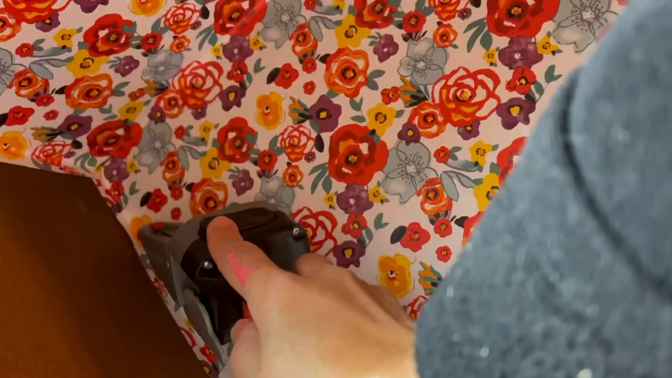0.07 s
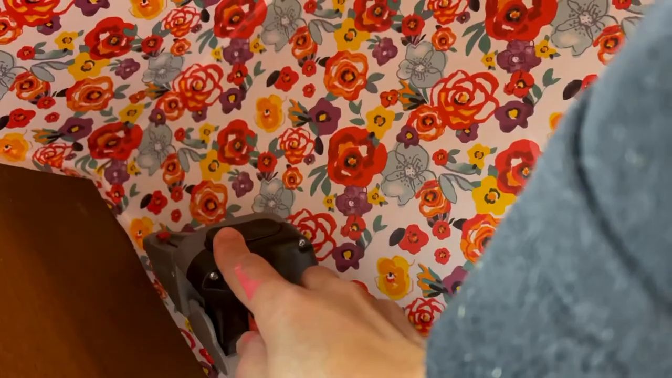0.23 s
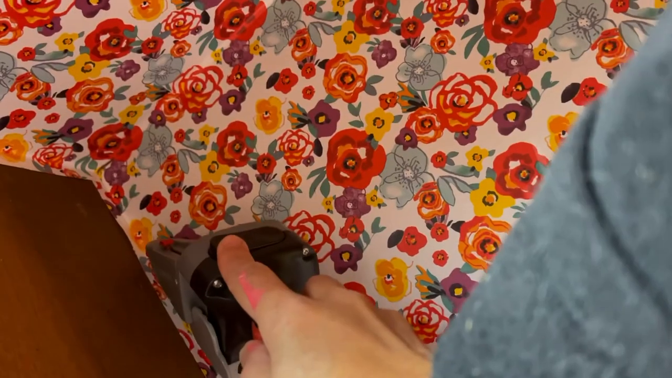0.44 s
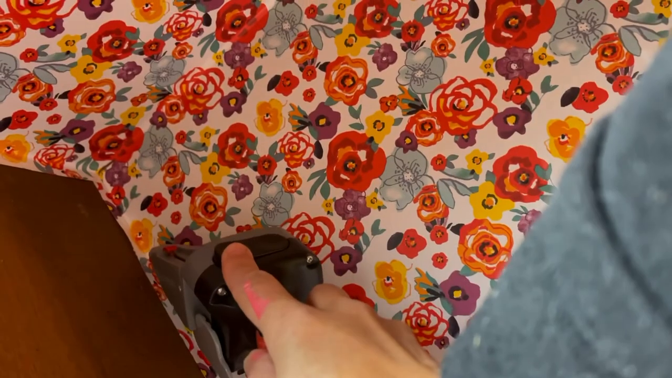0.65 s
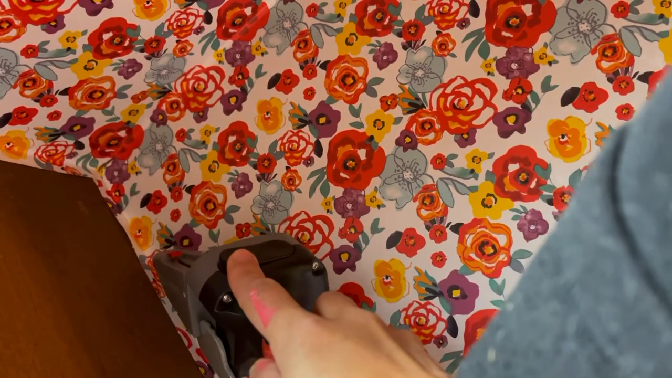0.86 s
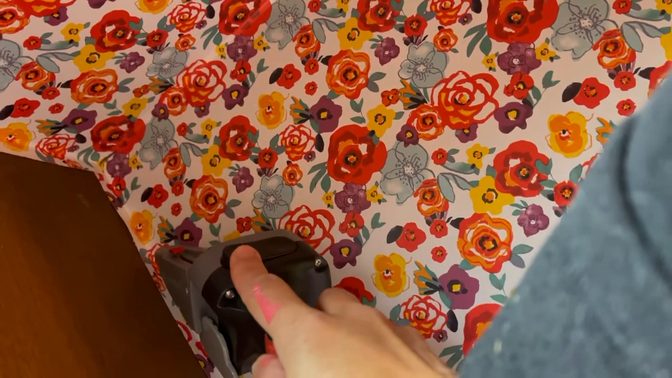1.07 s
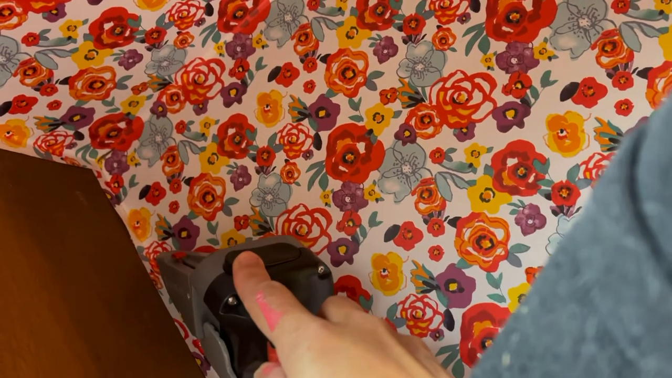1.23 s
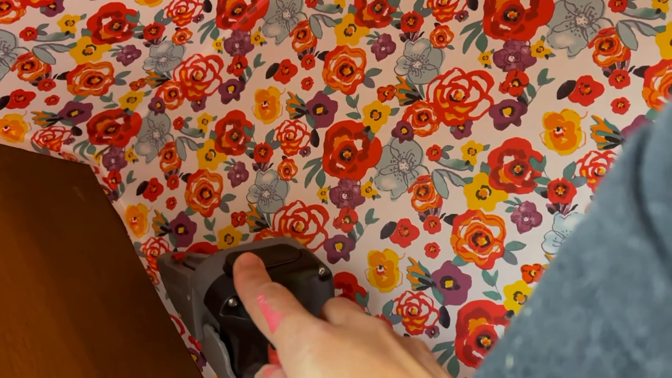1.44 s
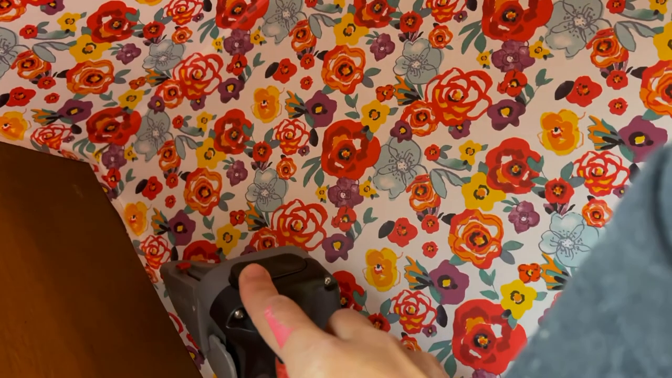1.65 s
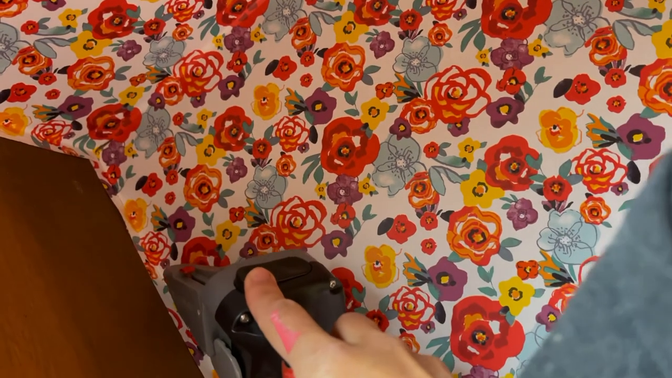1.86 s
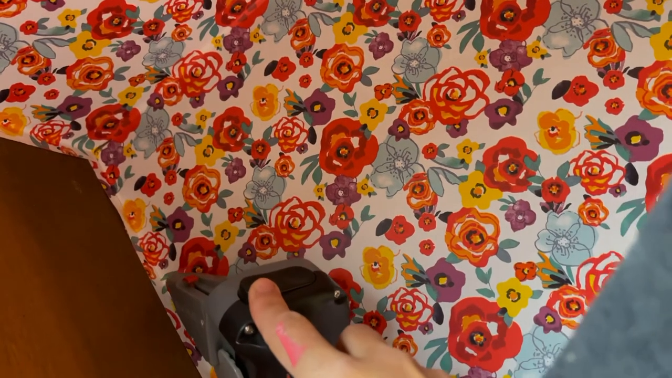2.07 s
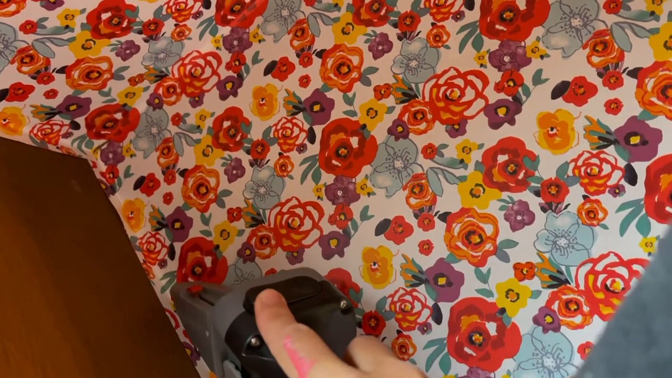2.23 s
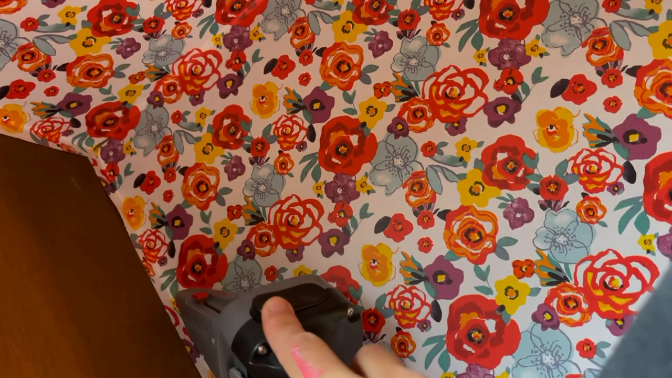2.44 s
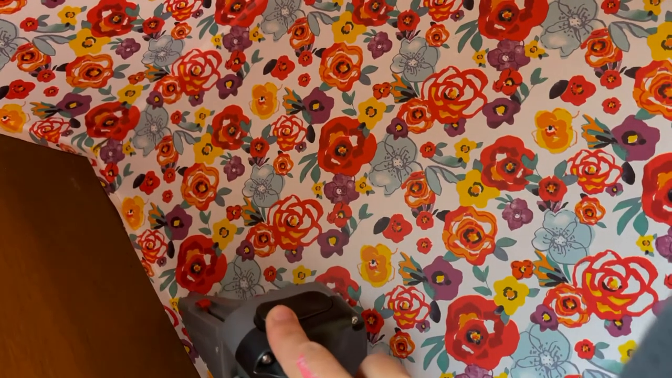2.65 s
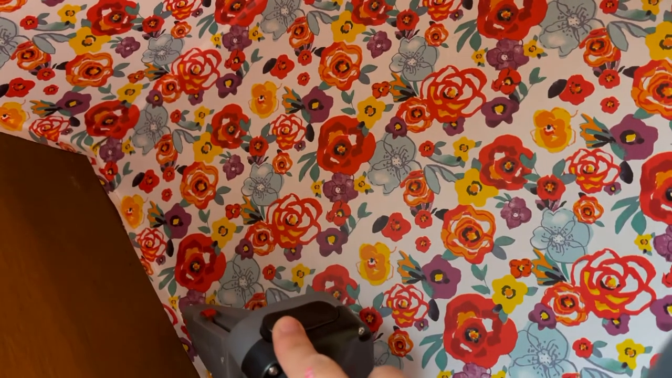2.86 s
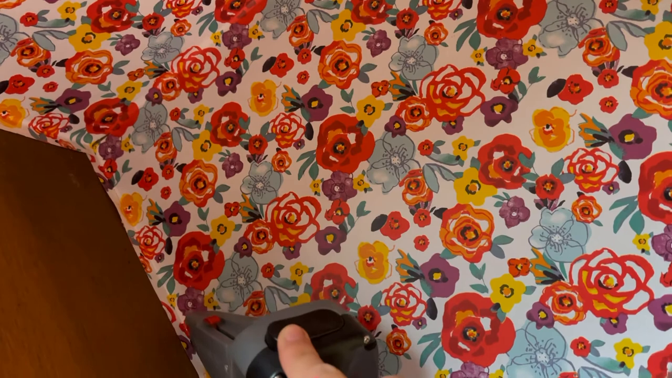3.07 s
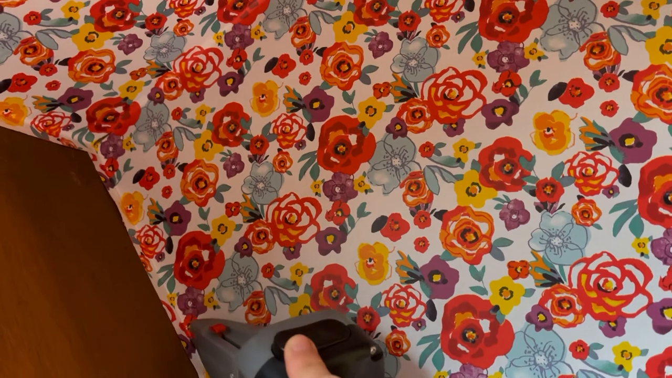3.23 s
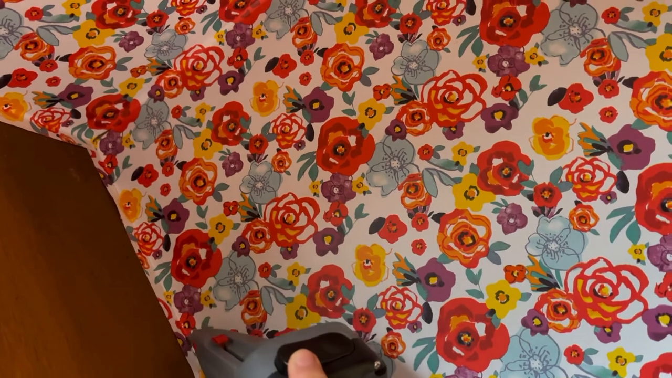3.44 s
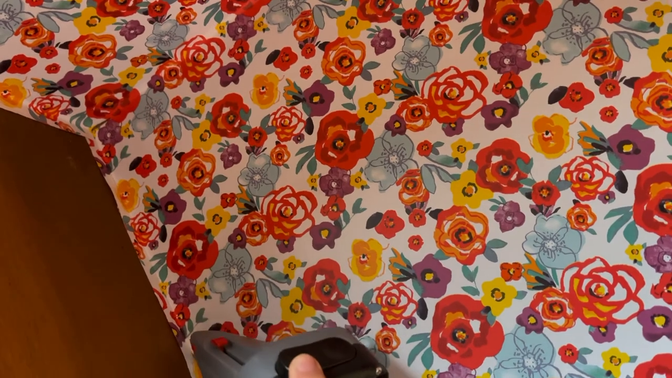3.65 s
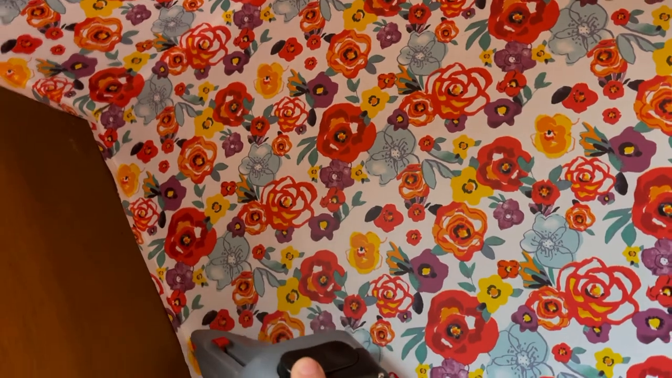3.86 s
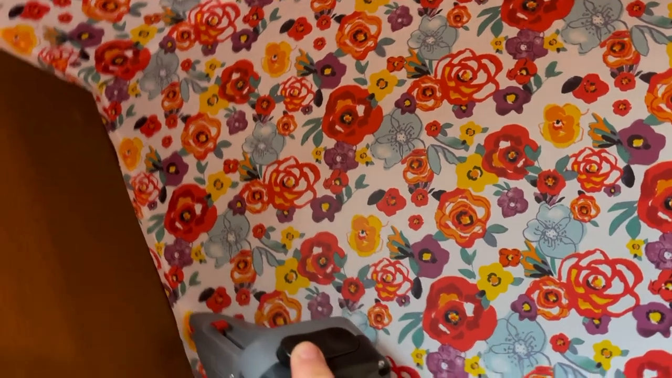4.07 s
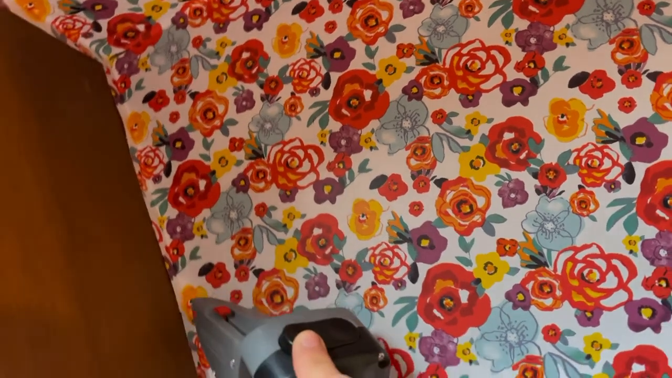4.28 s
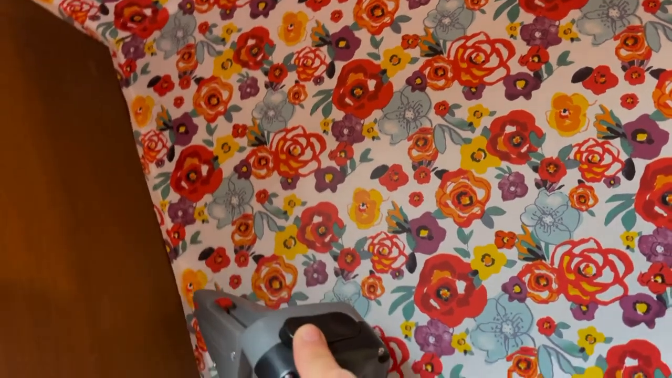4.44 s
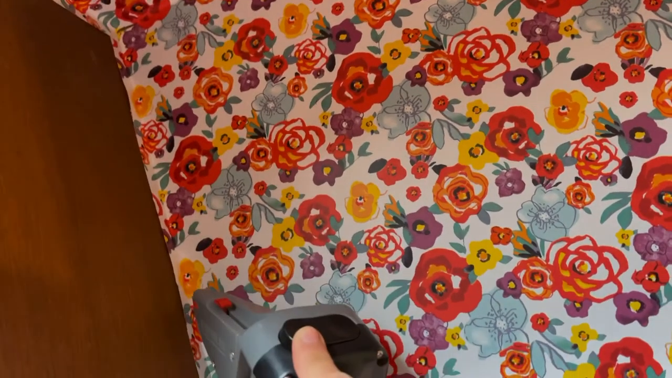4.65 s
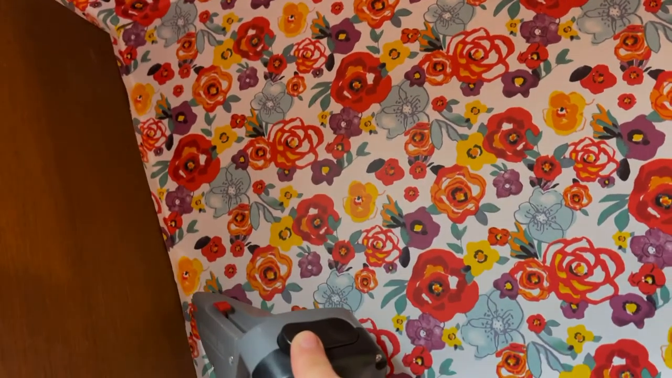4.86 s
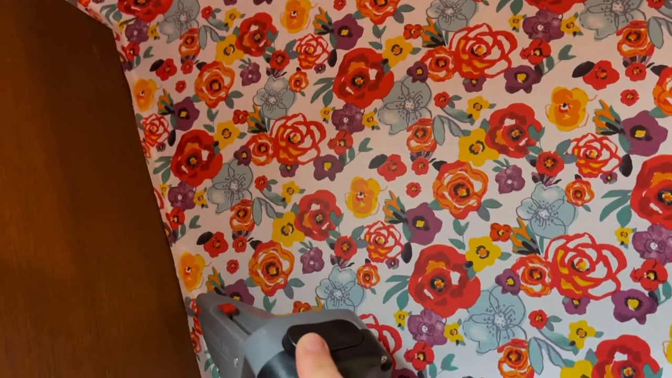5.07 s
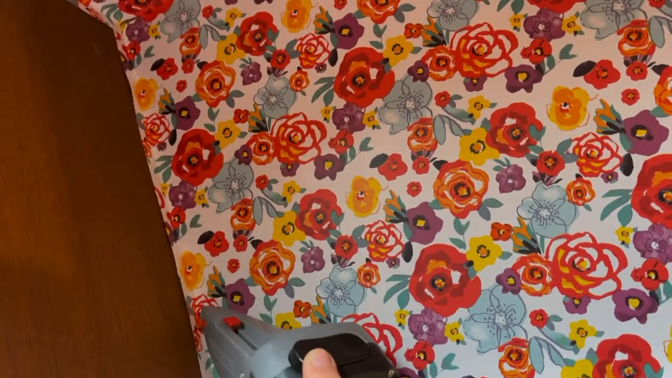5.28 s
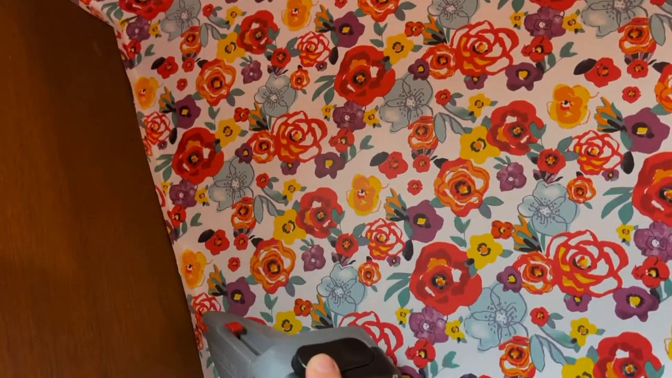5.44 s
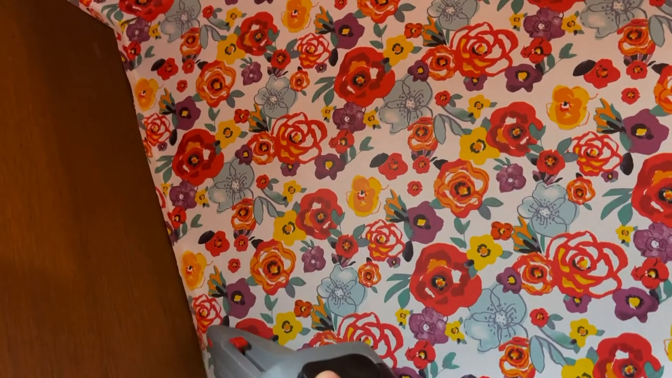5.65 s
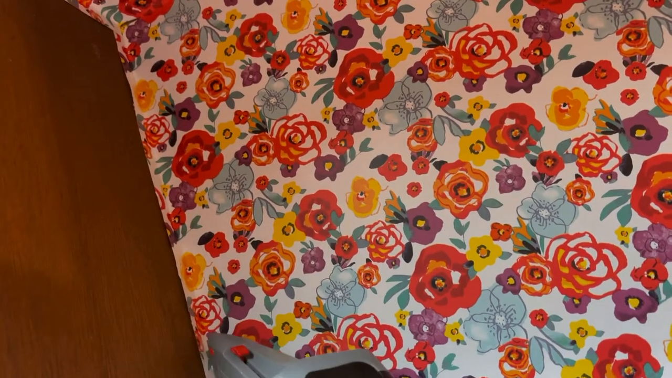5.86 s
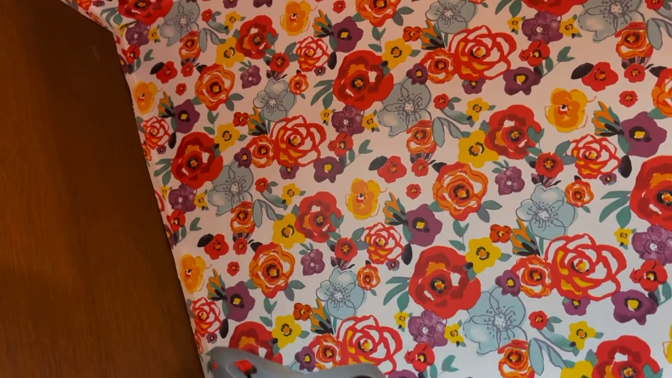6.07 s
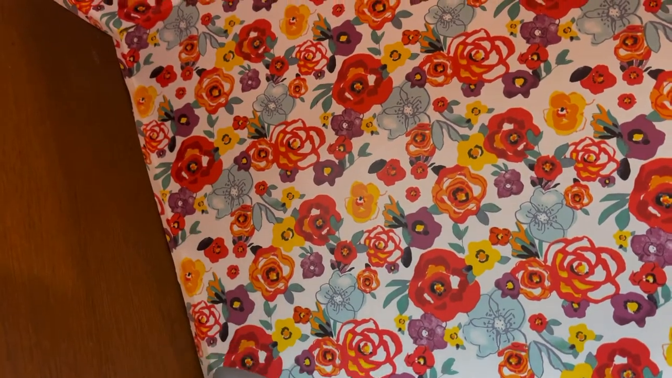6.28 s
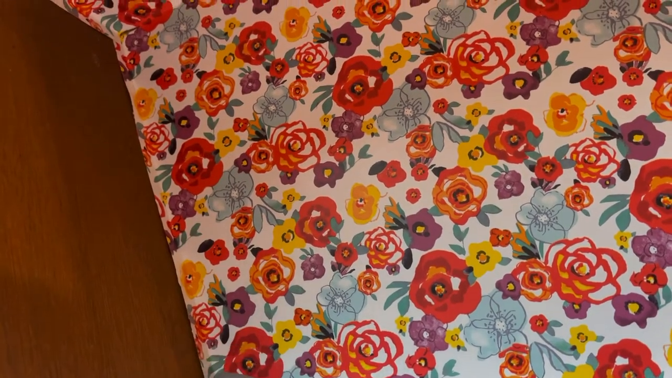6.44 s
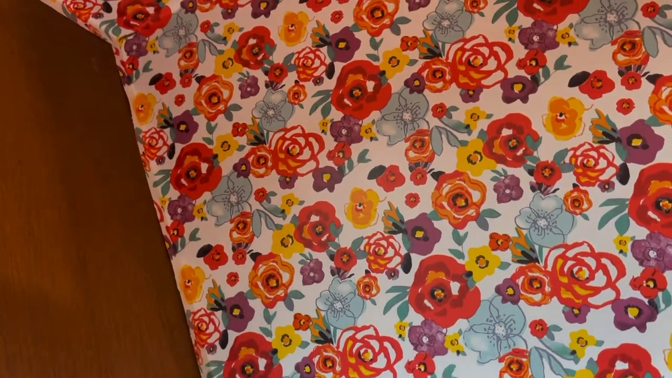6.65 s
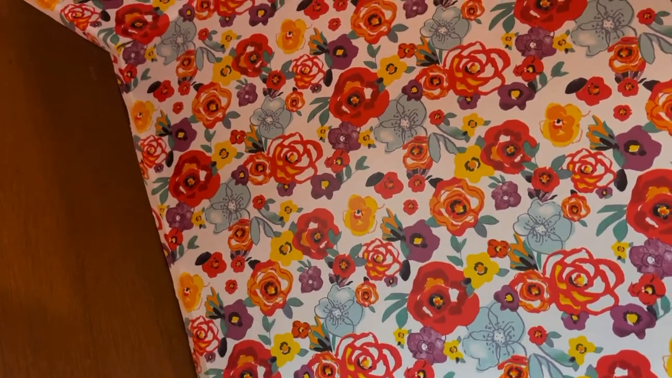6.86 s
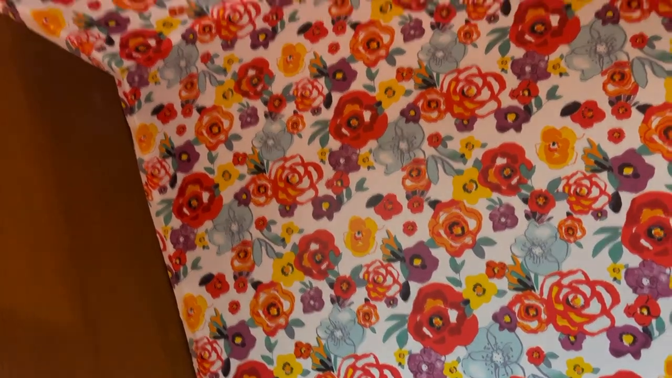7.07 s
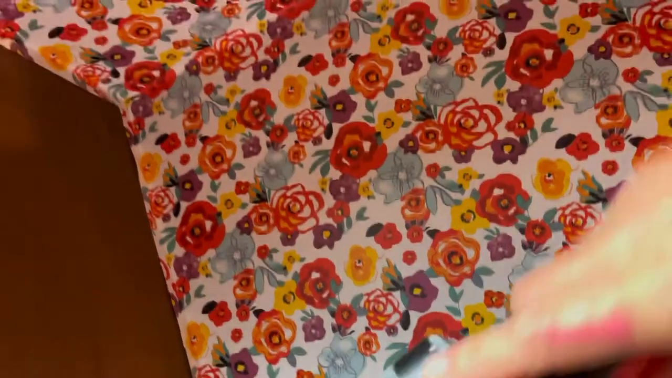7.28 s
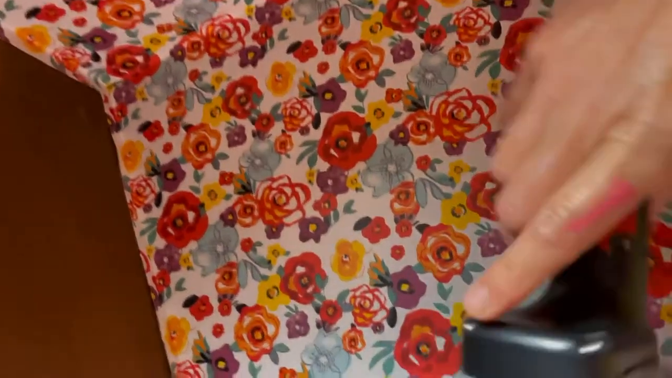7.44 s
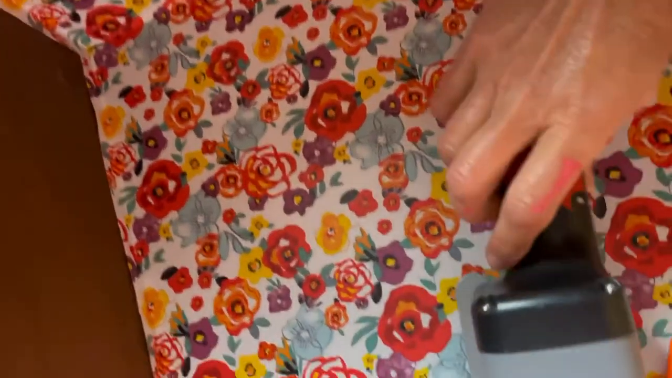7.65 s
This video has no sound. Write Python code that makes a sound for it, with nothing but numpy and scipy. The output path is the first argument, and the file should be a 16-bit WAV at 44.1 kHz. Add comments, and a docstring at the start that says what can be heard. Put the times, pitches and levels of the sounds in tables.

```python
"""A hard hand tool is pushed in short strokes along vinyl paper on the floor of a wooden cabinet, close by.
Rubbing is noise made of uneven slips, coloured by wood and vinyl; snags are short flurries, and the panel drums.
The edge skids off with a short rip made of jerks; faint squeaks are wavering tones.
A tool is put down: noise bursts for the clatter, struck low modes for the heavy thump.
Wall echoes, a slow sway and quiet noise surround it."""
import sys
import numpy as np
from scipy import signal
from scipy.fft import rfft, irfft, next_fast_len
from scipy.io import wavfile
from scipy.ndimage import uniform_filter1d

SR = 44100
rng = np.random.default_rng(int(sys.argv[2]) if len(sys.argv) > 2 else 0)


def store_wav(level_fs):
    """Save 16-bit WAV to argv[1]."""
    pcm = np.round(np.clip(np.atleast_2d(level_fs), -1, 1) * 32767)
    wavfile.write(sys.argv[1], SR, pcm.T.astype(np.int16))


N = 340011
SIZE = next_fast_len(N + SR)   # filter length, with room for tails
HZ = np.maximum(np.arange(SIZE // 2 + 1) * SR / SIZE, 1)
T = np.arange(N) / SR


def from_db(db):
    """Decibels to gain."""
    return 10 ** (np.asarray(db) / 20)


def rms_one(x):
    """Scaled to unit power."""
    return x / np.sqrt(np.mean(np.abs(x) ** 2) + 1e-20)


def over_hz(points):
    """A table joined by straight lines on a log-frequency axis."""
    hz, value = np.transpose(points)
    return np.interp(np.log(HZ), np.log(hz), value)


def causal(db):
    """The minimum-phase filter with these levels: nothing sounds early."""
    cepstrum = irfft(db * np.log(10) / 20, SIZE)
    cepstrum[1:SIZE // 2] *= 2
    cepstrum[SIZE // 2 + 1:] = 0
    return np.exp(rfft(cepstrum))


def through(x, response):
    """Filter a signal by a frequency response."""
    return irfft(rfft(x, SIZE) * response, SIZE)[..., :N]


def drift(rate_hz):
    """A random curve with spread 1: noise smoothed so that it wanders at about this rate."""
    r = np.exp(-2 * np.pi * rate_hz / SR)
    wander = signal.lfilter([1], [1, -2 * r, r * r], rng.standard_normal(N + SR))
    return rms_one(wander[SR:])


def ring(force, hz, t60_s):
    """A resonance: each unit click sets a dying sine of height 1 ringing."""
    r = from_db(-60 / (t60_s * SR))
    w = 2 * np.pi * hz / SR
    return signal.lfilter([0, np.sin(w)], [1, -2 * r * np.cos(w), r * r], force + 1e-18)


def fading(start_s, t60_s):
    """An envelope that jumps to 1 and dies away by 60 dB in t60_s."""
    out, first = np.zeros(N), int(start_s * SR)
    age = T[:min(int(2 * t60_s * SR) + 1, N - first)]
    out[first:first + len(age)] = from_db(-60 * age / t60_s)
    return out


def evened(x, seconds):
    """Unit level over stretches of this length; faster flutter stays."""
    power = uniform_filter1d(x * x, max(int(seconds * SR), 2))
    return x / np.sqrt(np.abs(power) + 1e-12)


def stroke(start_s, length_s, attack_s, release_s, arch_db):
    """One movement of the hand: it gets going, is strongest midway by arch_db, and comes to rest."""
    out = np.zeros(N)
    during = (T > start_s) & (T < start_s + length_s + release_s)
    age = T[during] - start_s
    rise = np.clip(age / attack_s, 0, 1)
    fall = np.clip((length_s - age) / release_s + .5, 0, 1)
    off_centre = np.minimum(2 * age / length_s - 1, 1)
    out[during] = rise * fall * from_db(-arch_db * off_centre ** 2)
    return out


# the edge catches and lets go: start_s, level_db (before the shares in scraping),
# brightness_db (moves the snag from wood to vinyl)
SNAG_EVENTS = [(0.043, -26.5, -5), (0.223, -33, -6.5), (0.277, -34, -1), (0.4634, -19, -3.5),
               (0.4816, -30, -3), (0.7828, -23.5, -3), (0.803, -27, -2), (1.12, -27, -3), (1.3696, -29, 0),
               (1.428, -26.5, -5), (1.469, -27, -1), (1.627, -41, -3), (1.668, -39.5, -1.5),
               (1.8973, -25.5, -7.5), (2.0348, -26, 2), (2.0754, -21.5, -2), (2.14, -25, -3),
               (2.205, -22.5, -5), (2.277, -26, -2.5), (2.3468, -29, 0), (2.366, -27, -3.5),
               (2.477, -25, -4), (2.5958, -22.5, -4.5), (2.658, -21, -2), (2.692, -26.5, 1.5),
               (2.724, -34.5, 7), (2.867, -28, -4.5), (2.92, -32.5, -13.5), (2.955, -27.5, -5.5),
               (3.016, -26.5, -6.5), (3.1623, -25, -2.5), (3.217, -24, -6), (3.2947, -22, -2.5),
               (3.3205, -20, -3), (3.446, -30, -5), (3.542, -24.5, -6.5), (3.568, -38.5, -8.5),
               (3.628, -22.5, -3), (3.74, -36, -3), (3.896, -31, -4), (4.026, -31, -8.5),
               (4.062, -31.5, -5), (4.137, -26, -8.5), (4.179, -26, -6), (4.199, -27, -9),
               (4.254, -19.5, -6), (4.384, -24.5, -3.5), (4.4154, -28, -12.5), (4.509, -19.5, -3.5),
               (4.565, -27.5, -9.5), (4.747, -30.5, -5), (4.832, -31, -7), (4.925, -28, -5),
               (5.08, -24.5, -4), (5.098, -21.5, -5), (5.171, -26, -5.5), (5.4844, -23, -8.5),
               (5.533, -20, -6.5), (5.594, -23, -8), (5.665, -25, -6.5), (5.69, -28, -9.5),
               (5.741, -34.5, -0.5), (5.8193, -29.5, -4), (5.887, -19.5, -1.5), (5.9162, -19.5, -6.5),
               (5.9682, -20, -6), (6.019, -25.5, -8), (6.078, -18.5, -6.5), (6.172, -19.5, -6.5),
               (6.253, -34.5, -18), (6.555, -32, -12), (6.625, -15, -6), (6.831, -36.5, -11)]
# colour of the hissing vinyl: freq_hz, level_db (relative)
VINYL_COLOUR = [(2500, -34.5), (4200, -6), (5200, -7.5), (7000, 1.5), (9000, -4.5), (12000, 1.5),
                (16000, -23.5)]
# a soft swish over the vinyl just before the skid
SWISH_S, SWISH_LENGTH_S, SWISH_DB, SWISH_RAMP_S = 6.87, 0.19, -60.5, 0.0089
# on one light, gliding push the vinyl hisses in a narrow band
ZING_S, ZING_LENGTH_S, ZING_DB, ZING_ARCH_DB, ZING_HZ, ZING_T60_S = 1.35, 0.26, -49.5, 8, 5620, 0.03
RASP_STEADY = 0.15   # share of the rasp's power that comes from the smoothly sliding sole


def scraping(rasp, hiss, back_db, rasp_db=2.0, hiss_db=1.0, snag_rasp_db=-14.0, snag_hiss_db=-9.5, snag_t60_s=0.046):
    """One friction force sounds the wood below and the vinyl skin above; a snag is a short flurry of slips."""
    grain = friction(slips_per_s=1900, spread_db=2.6, clump_db=2.1, clump_rate_hz=90, smooth=0.5,
                     catches_per_s=95, catch_db=2.5, catch_t60_s=0.015)
    grain = rms_one(grain + grit())
    flurry, catch, snap = rng.standard_normal(N), 0, 0
    for s, db, bright_db in SNAG_EVENTS:
        release = from_db(db) * fading(s, snag_t60_s)
        catch = catch + from_db(snag_rasp_db - bright_db) * release
        snap = snap + from_db(snag_hiss_db + bright_db) * release
    sliding = np.sqrt(1 - RASP_STEADY) * grain + np.sqrt(RASP_STEADY) * rng.standard_normal(N)
    wood_force = from_db(rasp_db) * rasp * sliding + catch * flurry

    swish = from_db(SWISH_DB) * stroke(SWISH_S, SWISH_LENGTH_S, SWISH_RAMP_S, SWISH_RAMP_S, 0)
    vinyl_force = from_db(hiss_db) * hiss * grain + (snap + swish) * flurry
    skin = through(vinyl_force, rms_one(causal(over_hz(VINYL_COLOUR) + back_db)))

    glide = from_db(ZING_DB) * stroke(ZING_S, ZING_LENGTH_S, PUSH_ATTACK_S, PUSH_RELEASE_S, ZING_ARCH_DB)
    zing = glide * rms_one(ring(sliding, ZING_HZ, ZING_T60_S))
    return wood(wood_force) + skin + zing


# pushes of the hand: start_s, length_s, rasp_db, hiss_db (vinyl), drum_db (panel); later steps trim all three
HAND_PUSHES = [(-0.01, 0.21, -44.5, -49.5, -39.5), (0.172, 0.29, -50.5, -54, -46),
               (0.69, 0.17, -48.5, -54.5, -43.5), (1.034, 0.16, -46, -51, -53),
               (1.278, 0.19, -56, -53.5, -61), (1.377, 0.25, -45.5, -50, -38.5),
               (1.76, 0.14, -45.5, -50.5, -43), (1.948, 0.28, -47, -50.5, -43),
               (2.334, 0.091, -47, -49, -38.5), (2.54, 0.35, -45, -51.5, -44),
               (2.87, 0.18, -45.5, -49.5, -44), (2.944, 0.25, -46.5, -64, -53),
               (3.146, 0.25, -43, -48, -39), (3.406, 0.093, -45.5, -48.5, -31.5),
               (3.461, 0.33, -43, -48.5, -43), (3.939, 0.26, -43.5, -49, -37.5),
               (4.123, 0.13, -46, -50, -36), (4.346, 0.15, -41, -50, -46), (4.465, 0.18, -54, -72, -36),
               (4.787, 0.084, -47.5, -55, -43), (5.016, 0.31, -41, -48.5, -33.5),
               (5.365, 0.32, -39.5, -47.5, -32), (5.864, 0.063, -36, -45.5, -40),
               (5.936, 0.15, -37, -47, -29), (6.04, 0.25, -36.5, -44, -26.5),
               (6.547, 0.18, -32, -41, -24.5), (6.825, 0.041, -43, -53, -43)]
PUSH_ATTACK_S, PUSH_RELEASE_S, PUSH_ARCH_DB = 0.017, 0.028, 8
# between pushes the tool creeps on: start_s, length_s, rasp_db (trimmed in scraping)
SLOW_CREEPS = [(-0.03, 0.94, -54.5), (0.971, 0.73, -54), (1.701, 3.03, -49), (4.545, 0.16, -61.5),
               (4.715, 1.06, -50), (5.808, 0.51, -49), (6.511, 0.272, -46.5)]
CREEP_RAMP_S, CREEP_ARCH_DB = 0.033, 1
CREEP_HISS_DB, CREEP_DRUM_DB = -6, 9.5   # relative to its rasp, before the later trims


def effort():
    """Pushes and creeping set the strength of the rasp, the hiss and the drumming; their powers add."""
    shapes, levels_db = [], []
    for s, length, db in SLOW_CREEPS:
        shapes.append(stroke(s, length, CREEP_RAMP_S, CREEP_RAMP_S, CREEP_ARCH_DB))
        levels_db.append([db, db + CREEP_HISS_DB, db + CREEP_DRUM_DB])
    for s, length, *push_db in HAND_PUSHES:
        shapes.append(stroke(s, length, PUSH_ATTACK_S, PUSH_RELEASE_S, PUSH_ARCH_DB))
        levels_db.append(push_db)
    return np.sqrt(from_db(levels_db).T ** 2 @ np.array(shapes) ** 2)


# the edge hangs and the rubbing weakens: start_s, length_s, change_db
EDGE_HALTS = [(0.234, 0.028, -4.5), (0.565, 0.05, -5.5), (1.239, 0.02, -5), (1.859, 0.03, -4.5),
              (1.9, 0.044, -2), (2.5, 0.031, -2.5), (2.73, 0.013, -6), (2.908, 0.021, -12),
              (3.277, 0.012, -4), (3.91, 0.035, -3), (4.153, 0.012, -8), (4.211, 0.033, -8),
              (4.398, 0.014, -4.5), (4.444, 0.014, -1), (4.53, 0.021, -1), (4.616, 0.058, -11),
              (5.465, 0.013, -5), (5.705, 0.034, -3), (5.848, 0.044, -3.5)]
HALT_RAMP_S = 0.0053


def sticking():
    """The share of the rubbing that is left while the edge hangs."""
    return from_db(sum(db * stroke(s, length, HALT_RAMP_S, HALT_RAMP_S, 0) for s, length, db in EDGE_HALTS))


def friction(slips_per_s, spread_db, clump_db, clump_rate_hz, smooth, catches_per_s, catch_db, catch_t60_s):
    """Tiny slips of uneven size come in clumps, on a bed of smooth sliding; small catches let go with a jerk."""
    sizes = from_db(spread_db * np.minimum(rng.exponential(1, N), 4)) * rng.choice([-1, 1], N)
    slips = rms_one(sizes * (rng.random(N) < slips_per_s / SR))
    catches = (rng.random(N) < catches_per_s / SR) * rng.random(N)
    decay = from_db(-60 / (catch_t60_s * SR))
    jerks = signal.lfilter([1], [1, -decay], catches + 1e-18)
    grip = from_db(clump_db * drift(clump_rate_hz)) * (1 + from_db(catch_db) * jerks)
    return evened((slips + smooth * rng.standard_normal(N)) * grip, 0.087)


TICKS_PER_S, TICK_DB, TICK_T60_S = 45, 3.5, 0.004   # level relative to the rubbing, before random sizes


def grit():
    """Specks crushed under the sole: dry, very short ticks."""
    ticks = (rng.random(N) < TICKS_PER_S / SR) * rng.uniform(.5, 2, N)
    decay = from_db(-60 / (TICK_T60_S * SR))
    bursts = signal.lfilter([1], [1, -decay], ticks + 1e-18)
    return from_db(TICK_DB) * bursts * rng.standard_normal(N)


# colour of the rubbed wood: freq_hz, level_db (relative)
WOOD_COLOUR = [(120, -41), (220, 4.5), (300, -4), (480, -0.5), (800, -3), (1200, -5.5), (1700, -8.5),
               (2400, -9.5), (3600, -10), (4600, -24), (5600, -21), (9000, -70)]
# the stiff corner, where the tool works at first, recolours the rasp: freq_hz, change_db
CORNER_COLOUR = [(280, 0.5), (370, -4.5), (500, 0), (780, 4.5), (1050, 2.5), (1380, -3.5), (1800, 0.5)]
CORNER_UNTIL_S = 1.36
ROCKING_HZ, RESONANCE_BEND = 3.5, 0.04   # pace of the rocking; largest bend as a share of the pitch


def wood(force):
    """The panel's answer to a rubbing force; its resonances bend down and up as the tool rocks."""
    out, forward, tilt = 0, frontness(), np.tanh(drift(ROCKING_HZ))
    corner = .5 - .5 * np.tanh((T - CORNER_UNTIL_S) / CROSSING_S)
    force = (1 - corner) * force + through(corner * force, causal(over_hz(CORNER_COLOUR)))
    # blend three fixed filters: bent down, straight, bent up
    for lean in (-1, 0, 1):
        back_db, front_db, _ = wood_db(lean * RESONANCE_BEND)
        part = force * np.maximum(1 - np.abs(tilt - lean), 0)
        for share, bumps_db in ((1 - forward, back_db), (forward, front_db)):
            out = out + through(share * part, rms_one(causal(over_hz(WOOD_COLOUR) + bumps_db)))
    return out


# higher resonances of panel and tool: pitch_hz, width_hz, back_db, front_db, edge_db
# (height above the rest; the tool's edge is weakened where it is used)
HIGH_RESONANCES = [(233, 78, -2.5, 3, -5.5), (295, 47, 5.5, 8, -6), (390, 35.6, 8, 10.5, 8.5),
                   (580, 60, 11, 9.5, 9), (663, 43, -14, 12, -6), (915, 50, 5.5, 11.5, 4),
                   (1084, 310, 0.5, 5, -0.5), (1400, 72, 9, 11, 11), (1613, 91, 3, 8, 5),
                   (1817, 17, 7, -10, -2), (1925, 145, -1, 8.5, -6), (2218, 190, 8, 8.5, 1),
                   (2550, 160, 7.5, 12, 3), (3007, 240, -2, 9, -6), (3760, 89, -15, -1, -6),
                   (4224, 460, 5.5, 11, 1.5), (5500, 760, 4.5, -4.5, 1), (6680, 810, -3, 20, -10.5)]


def wood_db(bend):
    """Resonance bumps in dB, pitches bent by this share: at the back, at the front, on the tool's edge."""
    bumps_db = 0
    for hz, width, *heights_db in HIGH_RESONANCES:
        peak = 1 / (1 + (2 * (HZ - hz * (1 + bend)) / width) ** 2)
        bumps_db = bumps_db + np.outer(heights_db, peak)
    return bumps_db


MIDWAY_S, CROSSING_S = 4.74, 0.38   # when and how fast the tool crosses the middle of the panel


def frontness():
    """The tool travels from the back of the panel (0) to the front (1), and other resonances take over."""
    return .5 + .5 * np.tanh((T - MIDWAY_S) / CROSSING_S)


# low modes of the panel: pitch_hz, t60_s, back_db (rubbed there), front_db (rubbed there), struck_db
PANEL_MODES = [(56.9, 0.17, -16, -17, -12), (70.8, 0.17, -8, -11, 0), (87, 0.27, -4, -9, -13),
               (121.8, 0.26, -4, 1.5, -8), (141.4, 0.16, 1, 2, -10.5), (159.9, 0.18, 3, 0, 1.5),
               (200.5, 0.11, -5.5, -3.5, -4), (385, 0.043, -13.5, -15.5, 1), (561, 0.13, -30, -54, 0.5)]


def panel(drum, skid_db=-26.0, skid_s=7.03, skid_t60_s=0.34):
    """The dragged tool shakes the panel's low modes, which also shudder after the skid."""
    force, forward, modes = thuds(), frontness(), 0
    for k, (hz, t60, back_db, front_db, _) in enumerate(PANEL_MODES):
        level = from_db(back_db + (front_db - back_db) * forward)
        modes = modes + level * ring(force, hz, t60)[SR:] * (-1) ** k
    shudder = from_db(skid_db) * uniform_filter1d(fading(skid_s, skid_t60_s), size=1500)
    return (drum + shudder) * evened(modes, 0.058)


# the sole rocks and bumps the panel: start_s, level_db
SOLE_BUMPS = [(0.15, -38.5), (0.81, -39.5), (1.11, -33), (1.805, -35), (1.9, -35.5), (2.648, -30),
              (3.075, -34.5), (3.2, -31.5), (3.315, -35), (3.54, -28.5), (3.625, -30), (3.735, -31.5),
              (4.392, -27), (4.482, -28), (4.70, -42), (4.805, -31), (5.465, -34), (5.645, -31.5),
              (5.91, -22.5), (5.965, -25.5), (6.575, -23.5), (6.671, -20.5)]
BUMP_LENGTH_S, BUMP_ARCH_DB, PUSH_DRUM_DB = 0.049, 14, -1
DRUM_T60_S, DRUM_LAG_S = 0.35, 0.017   # the panel answers late and rings on after each push


def drumming(drive):
    """How strongly the panel shakes: it follows the pushes a little late and jumps at every bump."""
    pushed = np.interp(T - DRUM_LAG_S, T, from_db(PUSH_DRUM_DB) * drive)
    ramp_s = BUMP_LENGTH_S / 10
    bumped = sum(from_db(db) * stroke(s, BUMP_LENGTH_S, ramp_s, ramp_s, BUMP_ARCH_DB) for s, db in SOLE_BUMPS)
    return ringing_on(np.hypot(pushed, bumped), DRUM_T60_S)


def ringing_on(level, t60_s):
    """A level that cannot fall faster than this decay."""
    decay = np.log(1000) * T / t60_s
    return np.exp(np.maximum.accumulate(np.log(level + 1e-9) + decay) - decay)


THUDS_PER_S, THUD_SPREAD_DB, THUD_SMOOTH = 70, 2.0, 0.028


def thuds():
    """The sole judders over the panel in uneven little thuds, on a weak bed of steady dragging."""
    count = N + SR   # one extra second lets the modes build up
    sizes = from_db(THUD_SPREAD_DB * rng.standard_normal(count)) * rng.choice([-1, 1], count)
    return sizes * (rng.random(count) < THUDS_PER_S / SR) + THUD_SMOOTH * rng.standard_normal(count)


# the skidding edge bites and lets go: start_s, level_db
EDGE_JERKS = [(7.003, -17), (7.0058, -14), (7.013, -15.5), (7.0185, -17.5), (7.027, -17.5), (7.04, -16),
              (7.0458, -15)]
JERK_T60_S = 0.024
# colour of the skid: freq_hz, level_db (relative)
SKID_TONE = [(40, -4), (120, 4), (300, -10), (550, -5), (800, -5.5), (1150, -3.5), (1550, -1.5), (2000, -2),
             (2600, 1), (3600, -7), (5500, -5), (8000, -5), (10500, -7), (12000, -6.5), (16000, -10.5)]
SKID_S, SKID_LENGTH_S, SKID_DB, SKID_ATTACK_S, SKID_RELEASE_S = 6.997, 0.045, -22.5, 0.0023, 0.011
SLIDE_S, SLIDE_LENGTH_S, SLIDE_DB, SLIDE_RAMP_S, SLIDE_UNEVEN_DB = 6.94, 0.653, -61, 0.0089, -1.5


def skid(edge_db):
    """The edge bites and stutters in quick jerks as it runs off the sheet, over a light slide that lasts longer."""
    grain = friction(slips_per_s=3000, spread_db=2.0, clump_db=1.2, clump_rate_hz=250, smooth=0.5,
                     catches_per_s=120, catch_db=-6.0, catch_t60_s=0.01)
    jerks = sum(from_db(db) * fading(s, JERK_T60_S) for s, db in EDGE_JERKS)
    scrape = from_db(SKID_DB) * stroke(SKID_S, SKID_LENGTH_S, SKID_ATTACK_S, SKID_RELEASE_S, 0)
    slide = from_db(SLIDE_DB) * stroke(SLIDE_S, SLIDE_LENGTH_S, SLIDE_RAMP_S, SLIDE_RAMP_S, 0)
    uneven = from_db(SLIDE_UNEVEN_DB * drift(22))
    # only the hard contact wakes the resonances
    hard = through((jerks + scrape) * grain, rms_one(causal(over_hz(SKID_TONE) + 0.65 * edge_db)))
    light = through(slide * uneven * grain, rms_one(causal(over_hz(SKID_TONE))))
    return hard + light


# at the end of the skid the tool strikes the panel, which rings: pitch_hz, t60_s, level_db
SKID_END_MODES = [(574, 0.12, -16.5), (910, 0.11, -33)]
SKID_HIT_S, SKID_HIT_LENGTH_S = 7.033, 0.011


def skid_ring():
    """The skid ends against the wood: a short, hollow ring that builds over the contact."""
    age, modes = np.maximum(T - SKID_HIT_S, 0), 0
    for hz, t60, db in SKID_END_MODES:
        modes = modes + from_db(db) * fading(SKID_HIT_S, t60) * np.sin(2 * np.pi * hz * age)
    return np.minimum(age / SKID_HIT_LENGTH_S, 1) * modes


# the weight of the tool lands and rocks once: start_s, level_db
WEIGHT_BLOWS = [(7.6213, -2.5), (7.629, -3.5)]
THUMP_CONTACT_S = 0.0023


def thump():
    """The tool's weight arrives as soft pushes on the panel, which radiates little of the slowest motion."""
    force = 0
    for s, blow_db in WEIGHT_BLOWS:
        push = np.sin(np.pi * np.clip((T - s) / THUMP_CONTACT_S, 0, 1))
        force = force + from_db(blow_db) * push / push.sum()
    modes = sum(from_db(db) * ring(force, hz, t60) for hz, t60, _, _, db in PANEL_MODES)
    return signal.sosfilt(signal.butter(2, 52, "high", fs=SR, output="sos"), modes)


# the housing touches and clatters as it lands: start_s, clack_db (plastic), knock_db (wood), t60_s
LANDING_TOUCHES = [(7.6, -60, -44, 0.12), (7.6097, -19, -32, 0.031), (7.6135, -13.5, -31, 0.022),
                   (7.617, -16, -31, 0.023), (7.621, -44, -27.5, 0.12), (7.632, -43, -38, 0.025)]
# light taps while the tools change hands: start_s, level_db
LIGHT_TAPS = [(7.3965, -31), (7.502, -41)]
# colours of the plastic clack and the wooden knock: freq_hz, level_db (relative)
CLACK_TONE = [(100, -25), (500, 3), (850, 2), (1300, -4), (2000, -6.5), (2900, -0.5), (4500, -12),
              (8000, -11.5), (11000, -15), (13000, -36), (16000, -55)]
KNOCK_TONE = [(60, 0), (250, -5), (400, -1), (600, 7.5), (900, -3), (1400, -15), (2900, -13), (4500, -18),
              (8000, -20), (11000, -20), (13000, -40), (16000, -61)]


def knocks(edge_db, tap_t60_s=0.014):
    """Hard plastic on wood: the housing clacks, the panel knocks; light taps sound only the wood."""
    clack = sum(from_db(db) * fading(s, t60) for s, db, _, t60 in LANDING_TOUCHES)
    knock = sum(from_db(db) * fading(s, t60) for s, _, db, t60 in LANDING_TOUCHES)
    taps = sum(from_db(db) * fading(s, tap_t60_s) for s, db in LIGHT_TAPS)
    out = 0
    for force, colour in ((clack, CLACK_TONE), (knock + taps, KNOCK_TONE)):
        response = rms_one(causal(over_hz(colour) + 0.45 * edge_db))
        out = out + through(force * rng.standard_normal(N), response)
    return out


# plastic squeaks: start_s, length_s, pitch_hz, level_db (of the swell; the sine lowers it by 3 dB)
PLASTIC_SQUEAKS = [(6.855, 0.07, 933, -49.5), (6.856, 0.015, 5470, -57), (7.439, .06, 2320, -52.5),
                   (7.436, 0.04, 6840, -68)]


def squeaks(waver=0.006):
    """Brief stick-slip tones that swell fast and fade, with a slightly wavering pitch."""
    out = np.zeros(N)
    for s, length, hz, db in PLASTIC_SQUEAKS:
        age = np.clip((T - s) / length, 0, 1)
        swell = rms_one(np.sqrt(age) * (1 - age) ** 2) * np.sqrt(length * SR / N)
        phase = 2 * np.pi * np.cumsum(hz * (1 + waver * drift(42.0))) / SR
        out += from_db(db) * swell * np.sin(phase)
    return out


# likeness of the reflections at the two ports: freq_hz, likeness (-1 to 1)
ECHO_LIKENESS = [(170, 1), (280, -.3), (550, -.25), (1000, .4), (1500, .35), (3500, -.3), (4800, .2),
                 (5700, .65), (7300, .4), (8600, .92), (10500, .75), (12000, .93)]


def reflections(t60_s, delay_s):
    """Dense echoes that die away, partly alike at the two ports."""
    mid, side = rms_one(rfft(rng.standard_normal((2, N)) * fading(delay_s, t60_s), SIZE))
    alike = np.clip(over_hz(ECHO_LIKENESS), -1, 1)
    return np.sqrt((1 + alike) / 2) * mid + np.sqrt((1 - alike) / 2) * side * np.array([[1], [-1]])


# phase between the two microphone ports: freq_hz, left_lead_radians
PORT_LEAD = [(20, 0), (380, -.15), (690, 1.0), (1030, 0), (2240, 0), (3010, 1.1), (3960, .3), (4220, 1.7),
             (4820, 3.2), (5250, 5.1), (5770, 6.2), (6630, 6.8), (8350, 9.3), (9820, 9.5), (11600, 11.9),
             (13000, 13.1), (16000, 15.6)]


def cabinet(x, walls_db, walls_t60_s=0.036, wander_hz=2.83, room_db=-17.5, room_t60_s=0.36, room_hz=4500, count=5):
    """Direct sound, quick echoes off the cabinet walls and a faint, dull workshop tail reach two microphone ports."""
    ports = np.exp(-1j * over_hz(PORT_LEAD) * np.array([[0], [1]]))
    room = from_db(room_db) * reflections(room_t60_s, 0.016) / (1 + 1j * HZ / room_hz)
    steady = through(x, ports * (1 + room))
    # hand and arm keep moving, so the pattern of the wall echoes shifts all the time
    shares = np.array([drift(wander_hz) for _ in range(count)])
    shares /= np.linalg.norm(shares, axis=0)
    walls = sum(through(share * x, ports * reflections(walls_t60_s, 0.00055)) for share in shares)
    return (steady + from_db(walls_db) * walls) / np.sqrt(1 + from_db(walls_db) ** 2)


PANEL_SIDE_DB = -28.5   # how much the long waves differ between the ports


def long_waves(x, echo_t60_s=0.064):
    """Low sound reaches both ports almost alike; faint echoes make the small difference."""
    side = through(x, rms_one(rfft(rng.standard_normal(N) * fading(0, echo_t60_s), SIZE)))
    return x + from_db(PANEL_SIDE_DB) * side * np.array([[1], [-1]])


# sway of the whole cabinet: time_s, level_db
SWAY_LEVELS = [(0.0, -63), (0.04, -46), (0.69, -54), (2.76, -42.5), (2.82, -55), (3.73, -37.5), (3.81, -49),
               (5.22, -44), (5.26, -37.5), (6.04, -31.5), (6.57, -45.5), (6.67, -29), (6.93, -55),
               (7.05, -30), (7.5, -48.5), (7.56, -47)]
SWAY_HZ, SWAY_T60_S = 46.1, 0.45


def cabinet_sway():
    """The whole cabinet sways: noise rings one very low resonance, with a level that follows the table."""
    sway = ring(rng.standard_normal(N + SR), SWAY_HZ, SWAY_T60_S)
    sway = signal.sosfilt(signal.butter(2, [38, 56], "band", fs=SR, output="sos"), sway)
    return from_db(np.interp(T, *np.transpose(SWAY_LEVELS))) * evened(sway[SR:], 0.1)


# colour of the quiet background: freq_hz, level_db (relative)
QUIET_COLOUR = [(20, -47), (60, 6), (120, 3), (250, -24.5), (600, -19.5), (2000, -67), (6000, -47.5),
                (16000, -65)]


def quiet_background(level_db=-50.5):
    """Steady, low-pitched noise under everything."""
    return from_db(level_db) * rms_one(through(rng.standard_normal(N), from_db(over_hz(QUIET_COLOUR))))


def scene():
    """Rubbing, then skid and knocks, each with its own close wall echoes, over the low sounds of the panel."""
    back_db, _, edge_db = wood_db(0)
    rasp, hiss, drum = effort()
    free = sticking()
    rubbing = scraping(rasp * free, hiss * free, back_db)
    rubbed = cabinet(rubbing + quiet_background(), walls_db=0.0)
    struck = cabinet(skid(edge_db) + skid_ring() + knocks(edge_db), walls_db=-0.5)
    low = long_waves(panel(drumming(drum)) + cabinet_sway() + thump())
    return rubbed + struck + squeaks() + low


# the microphone's port resonates in the top octave: freq_hz, level_db
PORT_RESONANCE = [(8500, -0.5), (10500, 3), (11450, 4), (12000, -4.5), (12800, -7.5), (13600, -18.5),
                  (14400, -21), (16000, -19)]
CUTOFF_HZ = 16000


def record(dry, top=0.85):
    """Port resonance, rounded peaks, and the top cut off."""
    x = through(dry, causal(over_hz(PORT_RESONANCE)))
    x = x / (1 + (x / top) ** 6) ** (1 / 6)
    return signal.sosfilt(signal.ellip(8, .2, 80, CUTOFF_HZ, fs=SR, output="sos"), x)


dry = scene()
out = record(dry)
store_wav(out)
```